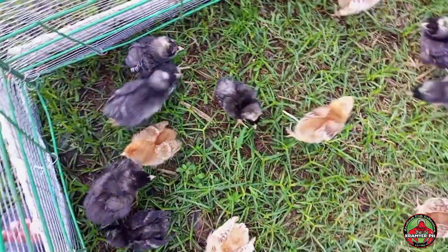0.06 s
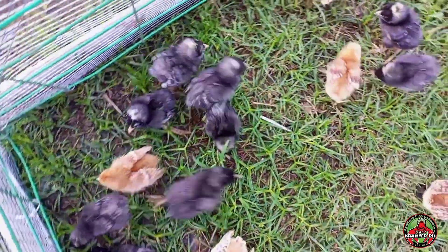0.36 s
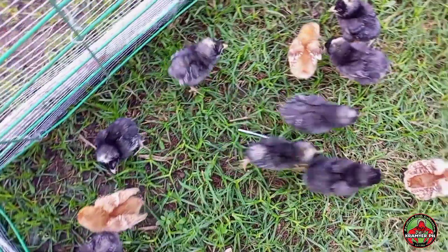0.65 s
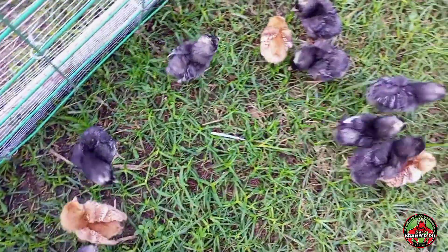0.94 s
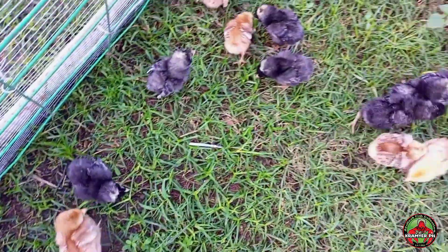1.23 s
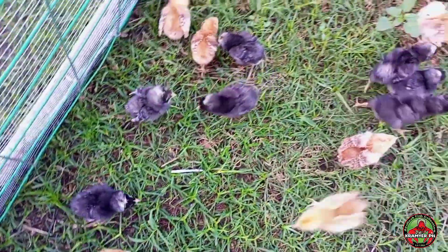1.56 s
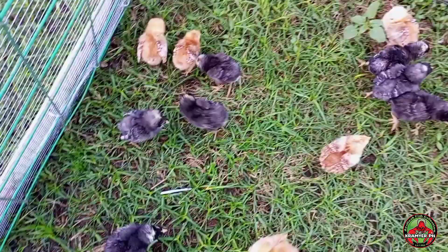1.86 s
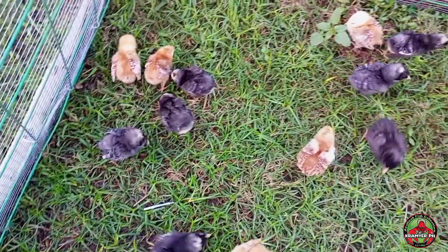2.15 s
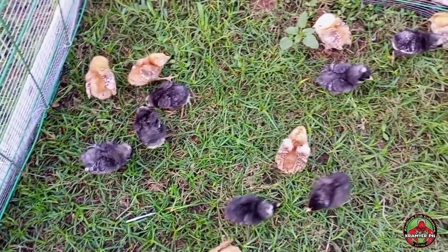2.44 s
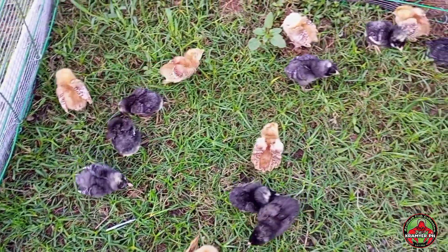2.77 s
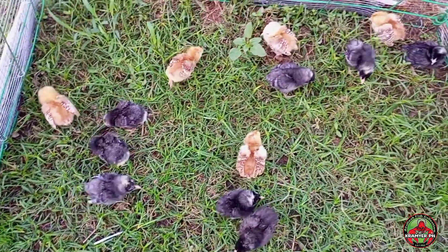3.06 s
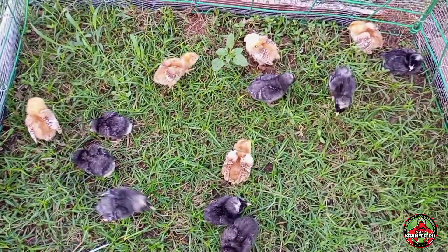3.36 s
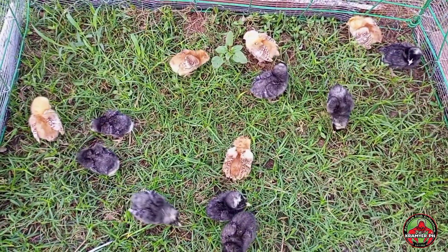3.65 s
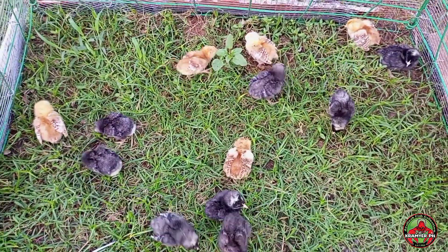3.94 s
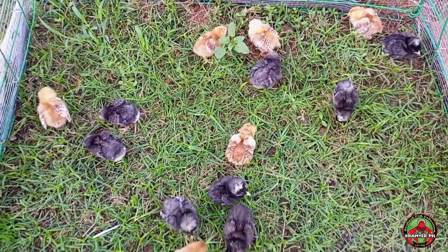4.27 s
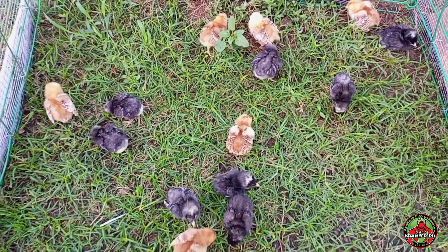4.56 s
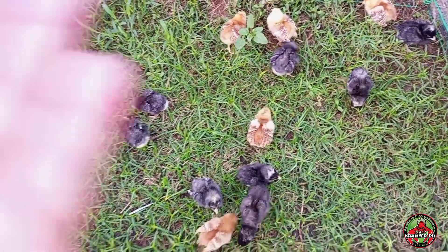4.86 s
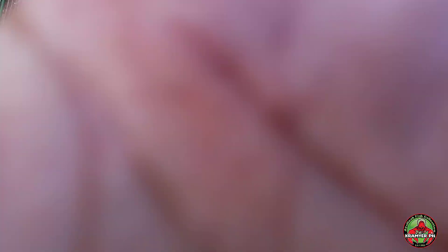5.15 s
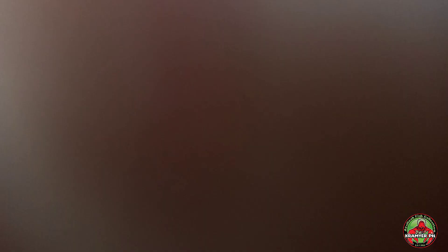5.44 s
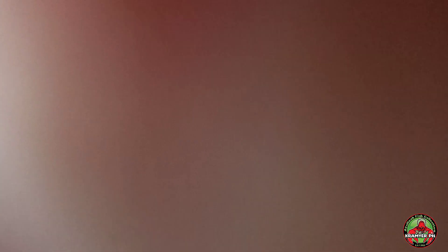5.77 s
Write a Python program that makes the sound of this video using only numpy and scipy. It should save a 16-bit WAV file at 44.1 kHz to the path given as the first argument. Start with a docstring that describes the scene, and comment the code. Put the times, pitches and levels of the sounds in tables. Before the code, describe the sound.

Close, overlapping peeps from a flock of baby chicks fill the whole stretch, each a quick, high whistle that drops in pitch. The open-air background is quiet: a thin insect shrill, an intermittent low hum, barely audible roosters and a distant dog that barks four times early and twice past the middle. Near the end, fingers knock briefly on the hand-held microphone.

```python
"""Young chicks peep over one another in a wire pen on grass, close to a hand-held microphone.
Each peep is a falling whistle with a weak octave; all share one arch of pitch and level.
Further off a dog yaps hoarsely, roosters crow, insects shrill and a low hum comes and goes.
The grip shifts with dull bumps; fingers tap the microphone midway and near the end."""
import sys
import numpy as np
from scipy import signal
from scipy.fft import rfft, irfft
from scipy.io import wavfile
from scipy.ndimage import uniform_filter1d, minimum_filter1d

SR = 44100
rng = np.random.default_rng(int(sys.argv[2]) if len(sys.argv) > 2 else 0)


def generate_wav(sig):
    """Save sig (samples, or channels by samples) to the path in sys.argv[1] as 16-bit PCM at SR."""
    pcm = np.round(np.clip(np.atleast_2d(sig).T, -1, 1) * 32767).astype(np.int16)
    wavfile.write(sys.argv[1], SR, pcm)


N = 255950
TIME_S = np.arange(N) / SR

# still air and distant flock: (frequency [Hz], relative density [dB])
AIR_SPECTRUM = [(30, -16), (70, 4.5), (130, -0.5), (240, -2), (350, -12), (800, -12.5), (1800, -12),
                (3000, -7.5), (5000, 9), (7000, -19), (11300, -32), (12500, -31.5), (15000, -10)]
# hum envelope: (time [s], level [dB])
HUM_ENVELOPE = [(0.0, -57), (0.27, -46), (0.76, -50), (0.98, -64), (1.06, -48.5), (1.45, -50), (1.53, -60),
                (2.37, -72), (2.97, -44.5), (3.54, -68), (4.13, -54.5), (4.2, -66.5), (4.73, -67),
                (4.9, -44), (5.3, -59), (5.35, -42), (5.65, -53), (5.8, -64)]
# held notes of far crows: (start [s], length [s], start pitch [Hz], end pitch [Hz], relative level [dB])
CROW_NOTES = [(0, .13, 816, 830, -51), (.45, 0.48, 796, 825, -64.5), (1.142, 0.74, 824, 890, -65.5),
              (2.651, 0.13, 572, 618, -50.5), (2.796, 0.57, 655, 628, -59), (4.107, .16, 856, 875, -56.5),
              (4.337, .37, 648, 704, -64), (4.488, 0.14, 824, 823, -52), (4.755, 0.089, 763, 978, -50.5),
              (5.048, 0.38, 833, 839, -47.5), (5.45, 0.24, 827, 835, -61)]
# short far whines: (start [s], length [s], start pitch [Hz], end pitch [Hz], relative level [dB])
WHINE_NOTES = [(1.37, 0.034, 1064, 1165, -52), (2.147, 0.029, 1133, 1040, -59),
               (3.462, .067, 1085, 937, -39.5), (4, 0.025, 980, 903, -40), (4.054, 0.138, 790, 717, -56.5),
               (4.951, 0.076, 1198, 1074, -54)]
# barks: (start [s], length [s], nominal pitch [Hz], relative level [dB],
# yelp start pitch [Hz], yelp end pitch [Hz], relative yelp level [dB])
DOG_BARKS = [(0.159, .13, 224.9, -36.5, 888, 929, -34), (0.66, 0.099, 248, -39, 966, 1036, -31),
             (1.136, 0.13, 233.5, -42.5, 990, 1081, -38), (1.587, 0.13, 273.4, -47, 858, 1172, -35.5),
             (3.213, 0.117, 221.6, -34, 902, 860, -37.5), (3.723, 0.11, 213.7, -33.5, 800, 862, -34.5)]
# dog's throat resonances: (centre [Hz], nominal width [Hz], gain [dB])
DOG_FORMANTS = [(666, 50, 4), (780, 140, -3.5), (1133, 140, 6.5), (1350, 92, 6), (1935, 380, 4.5),
                (2340, 140, 4), (5500, 300, -5)]
# fingertips on the case: (time [s], peak [dB], contact decay [s])
CASE_TAPS = [(2.771, -37, 0.0051), (2.864, -39.5, 0.0078), (5.1903, -23, 0.0008), (5.199, -12, 0.00017),
             (5.329, -24.5, 0.0022), (5.337, -15.5, 0.0028)]
# shifts of the grip: (time [s], peak [dB], resonance [Hz])
GRIP_BUMPS = [(1.017, -41.5, 233), (2.808, -40, 193), (2.964, -45, 161), (3.029, -64, 305),
              (3.254, -34.5, 125), (4.297, -51.5, 252), (4.821, -49, 249), (5.042, -44.5, 239),
              (5.319, -39, 57)]
# strength of the peep at each pitch: (pitch [Hz], gain [dB])
PEEP_GAIN = [(2200, 5.5), (2800, 2), (3400, 0), (3900, 0.5), (4400, -2), (4900, -1.5), (5600, -2)]
# strength of the peep's octave at each pitch: (pitch [Hz], gain [dB])
PEEP_OCTAVE_GAIN = [(2800, -8), (3100, -0.5), (3450, 5), (3800, -2), (4400, -1), (5200, -1.5)]
# near peeps: (start [s], length [s], top pitch [Hz], target pitch [Hz], bend [1 slides, 4 holds the top],
# plunge share of the fall [0-1], relative level [dB], loudest point [0-1], base octave level [dB])
NEAR_PEEPS = [(-0.03, 0.16, 4268, 2970, 2.22, 0.0, -6.5, 0.88, -17.5),
              (-0.02, 0.11, 4890, 3300, 3.54, 0.0, -6, 0.99, -40),
              (-0.015, 0.076, 5550, 4720, 0.6, 0.64, -19, 0.84, -32),
              (0.018, 0.12, 4820, 2790, 2, 0.0, -11, 0.37, -33),
              (0.049, 0.066, 3937, 2940, 1.412, 0.17, -6.5, 0.28, -20),
              (0.111, 0.13, 4950, 3120, 0.62, 0.35, -10, 0.27, -22),
              (0.159, 0.1, 4208, 1976, 2.6, 0.01, -8.5, 0.11, -17),
              (0.193, 0.13, 4050, 2910, 2.9, 0.04, -24.5, 0.37, -34.5),
              (0.241, 0.21, 5240, 2740, 1.9, 0.06, -24, 0.6, -21),
              (0.245, 0.067, 5100, 4550, 2.4, 0.2, -29, 0.4, -40),
              (0.315, 0.074, 4810, 2790, 0.88, 0.08, -4, 0.52, -42),
              (0.384, 0.12, 4894, 2630, 2.55, 0.0, -13.5, 0.14, -31),
              (0.397, 0.031, 4210, 2610, 0.6, 0.22, -18.5, 0.42, -38),
              (0.397, 0.081, 5314, 2620, 1.54, 0.01, -8.5, 0.76, -30),
              (0.416, 0.15, 4608, 2690, 1.22, 0.39, -8.5, 0.9, -25),
              (0.433, 0.22, 5090, 3510, 1.4, 0.0, -12.5, 0.6, -35),
              (0.435, 0.075, 5327, 4160, 0.45, 0.14, -13, 0.35, -29),
              (0.449, 0.047, 3950, 2680, 0.86, 0.37, -1.5, 0.19, -33.5),
              (0.477, 0.14, 5140, 3070, 2.5, 0, -23, 0.91, -38),
              (0.536, 0.082, 4493, 3210, 0.7, 0.52, -7.5, 0.76, -38),
              (0.558, 0.044, 4696, 2770, 0.85, 0, -14.5, 0.67, -32),
              (0.655, 0.16, 4997, 3000, 0.72, 0.37, -3.5, 0.91, -27.5),
              (0.663, 0.17, 5010, 2770, 1.45, 0.24, -14.5, 0.85, -34),
              (0.702, 0.12, 4905, 1995, 2.44, 0.12, -8, 0.13, -27.5),
              (0.717, 0.068, 4740, 2820, 0.5, 0.13, -14, 0.7, -44),
              (0.768, 0.15, 5210, 2760, 0.68, 0.28, -7.5, 0.84, -18.5),
              (0.804, 0.065, 4380, 2130, 0.63, 0.36, -2.5, 0.26, -38),
              (0.921, 0.12, 4585, 2940, 0.54, 0.33, -16, 0.66, -10.5),
              (0.93, 0.1, 6020, 5190, 1.14, 0.03, -31, 0.49, -40),
              (0.989, 0.14, 5000, 3020, 2.7, 0.04, -12, 0.91, -36),
              (1.028, 0.05, 3920, 2680, 1.05, 0.01, -13, 0.39, -45),
              (1.085, 0.0435, 4256, 3080, 1.02, 0.14, -5.5, 0.63, -38),
              (1.108, 0.16, 4955, 2005, 2.5, 0.3, -10.5, 0.82, -34),
              (1.11, 0.1206, 4255, 2580, 1.9, 0.32, -7.5, 0.34, -40),
              (1.115, 0.15, 4313, 2890, 2.6, 0.63, -10.5, 0.78, -31),
              (1.118, 0.073, 5090, 4160, 0.6, 0.03, -10, 0.81, -25),
              (1.138, 0.45, 4920, 4300, 1.5, 0.2, -22, 0.49, -43),
              (1.161, 0.066, 4180, 2530, 2.3, 0, -12.0, 0.67, -14.5),
              (1.214, 0.073, 4930, 3700, 0.77, 0.63, -19.0, 0.73, -34),
              (1.332, 0.13, 5050, 3150, 2.13, 0.46, -13.5, 0.95, -38),
              (1.342, 0.064, 4280, 2060, 2.8, 0.0, -17.5, 0.55, -37),
              (1.39, 0.033, 6220, 5040, 0.91, 0, -20, 0.23, -42),
              (1.397, 0.068, 4360, 3930, 0.602, 0.01, -12, 0.55, -31),
              (1.437, 0.055, 3610, 2490, 1.3, 0.02, -6.5, 0.15, -43),
              (1.445, 0.074, 4870, 2010, 0.58, 0.46, -6, 0.52, -19.5),
              (1.52, 0.044, 4080, 2340, 0.8, 0.26, -13.5, 0.43, -36),
              (1.538, 0.15, 4670, 2430, 1.95, 0.05, -15, 0.54, -22),
              (1.541, 0.13, 4394, 2630, 1.2, 0.34, -11.5, 0.81, -14),
              (1.605, 0.15, 4980, 3700, 2.6, 0.2, -34, 0.49, -40),
              (1.706, 0.058, 4580, 2670, 0.66, 0.17, -13, 0.57, -39.5),
              (1.711, 0.14, 5259, 1971, 2.6, 0.26, -12, 0.88, -23.5),
              (1.713, 0.17, 4520, 2013, 1.8, 0.76, -11, 0.78, -40),
              (1.762, 0.13, 4440, 2840, 0.6, 0.83, -13, 0.61, -44),
              (1.775, 0.059, 4260, 3400, 1.16, 0.0, 3.5, 0.45, -34.5),
              (1.819, 0.1, 4370, 2950, 0.672, 0.1, -17.5, 0.15, -34.5),
              (1.943, 0.076, 5100, 3700, 2.2, 0.13, -28.5, 0.58, -35),
              (1.948, 0.11, 4370, 2830, 1.16, 0.33, -7.5, 0.82, -18),
              (1.998, 0.12, 5960, 3010, 0.94, 0.28, -28.5, 0.12, -43),
              (2.044, 0.067, 4090, 2660, 1.73, 0.0, -21, 0.82, -41),
              (2.059, 0.067, 4550, 2900, 0.6, 0.17, -16, 0.78, -43.5),
              (2.118, 0.12, 4420, 2790, 0.64, 0.57, -16, 0.45, -18.5),
              (2.202, 0.12, 4880, 2650, 2.1, 0.0, -14.5, 0.37, -29),
              (2.235, 0.14, 5000, 2920, 2.2, 0.0, -19.5, 0.82, -24),
              (2.244, 0.086, 5330, 4740, 1.2, 0.0, -17.5, 0.7, -38),
              (2.248, 0.082, 5016, 2600, 1.27, 0.0, -12.5, 0.26, -41),
              (2.285, 0.05, 3610, 2840, 1.43, 0.02, -8, 0.26, -20.5),
              (2.332, 0.084, 5140, 3200, 0.55, 0.13, -13, 0.64, -34),
              (2.331, 0.077, 4650, 2360, 0.92, 0.32, -8, 0.48, -33),
              (2.371, 0.095, 4750, 2970, 2, 0.0, -21, 0.55, -32),
              (2.395, 0.097, 4170, 3140, 0.57, 0.3, -16, 0.51, -38),
              (2.486, 0.118, 6040, 2900, 0.9, 0.5, -25.5, 0.2, -26),
              (2.518, 0.0893, 5080, 2760, 1.3, 0.04, -16.5, 0.83, -44.5),
              (2.526, 0.12, 4430, 2880, 1.01, 0.38, -12, 0.73, -21.5),
              (2.544, 0.14, 4775, 2370, 0.8, 0.63, -21.5, 0.88, -33),
              (2.573, 0.093, 4890, 3500, 1.8, 0.56, -14, 0.55, -30),
              (2.602, 0.13, 4890, 2540, 2.77, 0.0, -12, 0.69, -34),
              (2.657, 0.052, 3860, 2930, 2, 0.15, -6.5, 0.63, -33),
              (2.681, 0.15, 4700, 4200, 2.5, 0.6, -36, 0.93, -38),
              (2.753, 0.13, 5028, 2000, 2.18, 0.07, -7, 0.47, -48),
              (2.81, 0.064, 4420, 2006, 0.628, 0.53, -9, 0.81, -18.5),
              (2.821, 0.072, 4076, 2000, 0.74, 0.01, -23.5, 0.21, -41),
              (2.951, 0.14, 4714, 2690, 0.82, 0.46, -13, 0.83, -21),
              (2.98, 0.14, 4840, 3150, 2.2, 0.0, -12.5, 0.19, -28),
              (2.982, 0.088, 5840, 3600, 1.27, 0.28, -22, 0.21, -38),
              (3.065, 0.059, 4350, 2880, 0.73, 0.27, -6, 0.44, -30.5),
              (3.127, 0.084, 5410, 1980, 0.65, 0.31, -11.5, 0.45, -30),
              (3.196, 0.12, 4915, 3000, 2.08, 0.04, -13.5, 0.845, -28.5),
              (3.27, 0.15, 4760, 4620, 2.7, 0.5, -36, 0.56, -40),
              (3.376, 0.14, 4647, 3240, 0.56, 0.32, -10, 0.77, -19.5),
              (3.386, 0.081, 4633, 3800, 0.6, 0.05, -7.5, 0.42, -30),
              (3.416, 0.059, 5810, 4470, 1.5, 0.1, -31.5, 0.19, -38),
              (3.514, 0.067, 5170, 3080, 0.66, 0.03, -20.5, 0.67, -38),
              (3.516, 0.095, 5310, 1970, 1.1, 0.31, -14, 0.83, -38),
              (3.535, 0.17, 4940, 2620, 0.56, 0.32, -18, 0.76, -20.5),
              (3.592, 0.13, 5040, 3380, 1.4, 0.0, -15.5, 0.15, -23.5),
              (3.632, 0.11, 4910, 1984, 0.75, 0.47, -14, 0.16, -36),
              (3.727, 0.065, 4690, 2016, 1.9, 0.42, -26.5, 0.51, -26),
              (3.75, 0.056, 5023, 3470, 1.16, 0.68, -11, 0.7, -38),
              (3.785, 0.11, 6150, 2900, 1.73, 0.08, -21.5, 0.94, -40),
              (3.798, 0.058, 4660, 1950, 0.63, 0.33, -14, 0.66, -31),
              (3.908, 0.15, 4350, 3420, 1.6, 0.04, -13, 0.41, -14.5),
              (3.914, 0.14, 4220, 2710, 0.6, 0.72, -16.5, 0.77, -38),
              (3.916, 0.094, 5170, 2020, 1.21, 0.25, -8.5, 0.56, -45),
              (3.937, 0.098, 4800, 2570, 1.8, 0.02, -12.5, 0.35, -30),
              (3.946, 0.17, 5020, 2780, 2.3, 0.43, -18.5, 0.95, -40),
              (4.035, 0.2, 4730, 2820, 3.7, 0.8, -23, 0.93, -27.5),
              (4.261, 0.1, 5910, 3020, 1.78, 0.03, -23.5, 0.87, -40),
              (4.342, 0.16, 5410, 3350, 0.6, 0.31, -9.5, 0.76, -21.5),
              (4.405, 0.0684, 4080, 2020, 2.4, 0.51, -9.5, 0.13, -40.5),
              (4.427, 0.11, 5030, 3370, 2.2, 0.0, -14, 0.64, -29.5),
              (4.504, 0.088, 4990, 3000, 1.15, 0.2, -14, 0.8, -30),
              (4.594, 0.13, 4363, 2540, 1.8, 0.39, -20.0, 0.97, -45.5),
              (4.629, 0.095, 5220, 2710, 1.52, 0.04, -20.5, 0.83, -42),
              (4.669, 0.13, 5970, 1980, 1.63, 0.04, -30.5, 0.33, -26),
              (4.808, 0.19, 5077, 2040, 3.9, 0.5, -19, 0.88, -17),
              (4.827, 0.23, 5330, 2940, 0.81, 0.2, -20, 0.97, -51),
              (4.828, 0.067, 4780, 2380, 1.13, 0, -33, 0.7, -35),
              (4.871, 0.1, 4200, 2640, 2, 0.0, -23, 0.85, -13),
              (4.911, 0.14, 4223, 2000, 3.5, 0.22, -19, 0.92, -52),
              (4.923, 0.11, 5050, 1990, 2.4, 0.7, -12.5, 0.76, -27),
              (4.948, 0.14, 4720, 2000, 1.03, 0.38, -23.5, 0.89, -20),
              (4.976, 0.13, 4607, 1995, 2.6, 0.46, -13, 0.39, -21.5),
              (5.009, 0.066, 3884, 2920, 1.8, 0.21, -5.5, 0.35, -49.5),
              (5.125, 0.13, 6000, 2620, 2.05, 0.05, -31, 1, -19),
              (5.257, 0.14, 5200, 1998, 2.25, 0.12, -11.5, 0.81, -27),
              (5.263, 0.087, 4165, 2880, 0.91, 0.23, -15.0, 0.77, -38),
              (5.287, 0.14, 5230, 2590, 1.4, 0.19, -19, 0.13, -30),
              (5.331, 0.069, 4335, 2005, 0.66, 0.42, -6.5, 0.26, -36),
              (5.428, 0.15, 4975, 3660, 1.48, 0, -23.5, 0.4, -11.5),
              (5.435, 0.1, 4980, 3250, 0.91, 0, -37, 0.5, -30),
              (5.555, 0.035, 3640, 2250, 0.76, 0.0, -21.5, 0.51, -11),
              (5.559, 0.082, 4130, 3190, 0.63, 0.09, -12.5, 0.26, -18.5),
              (5.62, 0.11, 5358, 3510, 2.26, 0.01, -8, 0.96, -49.5),
              (5.664, 0.1, 5426, 2080, 0.7, 0.3, -14.5, 0.8, -28),
              (5.704, 0.071, 4207, 2014, 0.73, 0.52, -8, 0.22, -34),
              (5.747, 0.076, 5500, 4680, 0.87, 0, -24.5, 0.4, -30)]


def undb(db):
    """Decibels to gain."""
    return 10 ** (np.asarray(db) / 20)


def unit_rms(x):
    """Scale to rms 1."""
    return x / np.sqrt(np.mean(x ** 2) + 1e-20)


def add(out, start_s, x):
    """Mix x into out from start_s on."""
    i = int(round(start_s * SR))
    x, i = x[max(-i, 0):], max(i, 0)
    out[i:i + len(x)] += x[:max(N - i, 0)]


def ring(x, hz, width_hz, stages):
    """Cascade of equal resonances, gain 1 at the centre."""
    for _ in range(stages):
        x = signal.lfilter(*signal.iirpeak(hz, hz / width_hz, fs=SR), x)
    return x


def walk(rate_hz, size=N):
    """Smooth random drift, spread about 1."""
    step = max(int(SR / rate_hz), 1)
    return 1.2 * uniform_filter1d(np.repeat(rng.standard_normal(size // step + 1), step), step)[:size]


def phase_rad(hz):
    """Phase of a moving pitch."""
    return 2 * np.pi * np.cumsum(hz) / SR


def swell(u, edge):
    """Rounded rise and fall over u = 0..1; a smaller edge is steeper."""
    return np.sin(np.pi / 2 * np.clip(np.minimum(u, 1 - u) / edge, 0, 1)) ** 2


def scatter(x, t60_s, wet_db, delay_s):
    """Direct sound plus scatter from fence, walls and trees."""
    t = np.arange(SR) / SR
    tail = rng.standard_normal(SR) * undb(-60 * t / t60_s) * np.clip(t / delay_s - 1, 0, 1)
    return x + undb(wet_db) * signal.fftconvolve(x, tail / np.linalg.norm(tail))[:N]


def noise_band(hz, half_width_hz):
    """Low-passed noise shifted up to hz, rms 1."""
    lowpass = signal.butter(3, half_width_hz, fs=SR, output="sos")
    real, imag = (unit_rms(signal.sosfilt(lowpass, rng.standard_normal(N))) for _ in range(2))
    return unit_rms(np.real((real + 1j * imag) * np.exp(2j * np.pi * hz * TIME_S)))


def air(level_db=-54):
    """Faint open-air noise, drifting slightly in level."""
    hz, db = np.transpose(AIR_SPECTRUM)
    colour = undb(np.interp(np.log(np.fft.rfftfreq(N, 1 / SR) + 1), np.log(hz), db))
    noise = irfft(rfft(rng.standard_normal(N)) * colour, N)
    return unit_rms(noise) * undb(level_db + walk(5.48))


def insects(shrill_db=-45, trill_db=-50, chorus_db=-51, stroke_hz=18, trill_hz=8080, sweep_hz=800):
    """A steady shrill, and one nearer insect whose strokes glide up over a chorus of its kind."""
    shrill = noise_band(hz=10330, half_width_hz=480) * undb(shrill_db + 0.27 * walk(31))
    stroke = phase_rad(stroke_hz * (1 + .08 * walk(5))) / (2 * np.pi) % 1
    pitch_hz = trill_hz + sweep_hz * (stroke - .5) + 130 * walk(1200)
    trill = unit_rms(np.sin(phase_rad(pitch_hz)) * swell(stroke, 1.0)) * undb(trill_db)
    chorus = noise_band(hz=8300, half_width_hz=750) * undb(chorus_db + walk(29))
    return shrill + trill + chorus


def hum(start_hz=130, end_hz=122.5, octave_db=-21, rumble_db=-8, flutter_db=0.5):
    """A slowly sinking low tone and a little rumble swell and fade together."""
    phase = phase_rad(np.linspace(start_hz, end_hz, N))
    tone = unit_rms(np.sin(phase) + undb(octave_db + 3.9 * walk(5.5)) * np.sin(2 * phase))
    rumble = unit_rms(ring(rng.standard_normal(N), hz=125, width_hz=59, stages=2))
    level_db = np.interp(TIME_S, *np.transpose(HUM_ENVELOPE)) + flutter_db * walk(22)
    return (tone + undb(rumble_db) * rumble) * undb(level_db)


def far_notes(notes, fundamental_db, octave_db, waver, flicker_db):
    """Distance leaves two partials of each hoarse note, broken up and blurred by echoes."""
    out = np.zeros(N)
    for start_s, length_s, from_hz, to_hz, db in notes:
        size = int(length_s * SR)
        u = np.linspace(0, 1, size)
        phase = phase_rad(np.linspace(from_hz, to_hz, size) * (1 + waver * walk(450, size)))
        note = undb(fundamental_db) * np.sin(phase) + undb(octave_db) * np.sin(2 * phase)
        add(out, start_s, note * swell(u, 0.13) * undb(db + flicker_db * walk(39.2, size)))
    return scatter(out, t60_s=0.059, wet_db=-1.5, delay_s=0.011)


def roosters():
    """Far crows, strongest at the octave."""
    return far_notes(CROW_NOTES, fundamental_db=-9, octave_db=-4, waver=.026, flicker_db=6)


def whines():
    """Short far glides, nearly pure."""
    return far_notes(WHINE_NOTES, fundamental_db=-6, octave_db=-37, waver=0.016, flicker_db=5.5)


def dog(jitter=0.026, arch=0.1508, yelp_waver=0.033, yelp_octave_db=-19.5, yelp_lead_s=.02, gain_db=1):
    """Hoarse, uneven pulses ring the throat; a wavering yelp leads each bark."""
    out = np.zeros(N)
    for start_s, length_s, hz, db, from_hz, to_hz, yelp_db in DOG_BARKS:
        size = int(length_s * SR)
        u = np.linspace(0, 1, size)
        phase = phase_rad(hz * (1 + arch * (np.sin(2 * u) - .75) + jitter * walk(300, size)))
        pulses = unit_rms(sum(np.cos(k * phase) for k in range(1, 13)))
        rasp = rng.standard_normal(size) * (1 + np.cos(phase))
        bark = sum(undb(formant_db) * ring(pulses + rasp, formant_hz, 1.06 * width_hz, stages=2)
                   for formant_hz, width_hz, formant_db in DOG_FORMANTS)
        add(out, start_s, unit_rms(bark * swell(u, 0.29)) * undb(db))
        yelp_phase = phase_rad(np.linspace(from_hz, to_hz, size) * (1 + yelp_waver * walk(231, size)))
        yelp = np.sin(yelp_phase) + undb(yelp_octave_db) * np.sin(2 * yelp_phase)
        add(out, start_s - yelp_lead_s, unit_rms(yelp * swell(u, 0.25)) * undb(yelp_db))
    return scatter(out, t60_s=0.21, wet_db=-2, delay_s=0.0071) * undb(gain_db)


def knock(peak_db, hz, width_hz, contact_s):
    """A brief push into a damped, steep-sided resonance."""
    t = np.arange(SR // 5) / SR
    push = rng.standard_normal(len(t)) * np.exp(-t / contact_s)
    body = ring(push, hz, width_hz, stages=3)
    return body / np.abs(body).max() * undb(peak_db)


def handling():
    """Fingers tap the case; the grip shifts with dull bumps."""
    out = np.zeros(N)
    for start_s, peak_db, contact_s in CASE_TAPS:
        add(out, start_s, knock(peak_db, hz=1050, width_hz=1750, contact_s=contact_s))
    for start_s, peak_db, hz in GRIP_BUMPS:
        add(out, start_s, knock(peak_db, hz, width_hz=0.45 * hz, contact_s=0.019))
    return out


def peep_pitch_hz(u, length_s, top_hz, target_hz, bend, plunge, floor_hz=2190, scoop_hz=168, scoop_s=.008):
    """Pitch scoops up briefly, then falls, often plunging at the end."""
    fall = (1 - plunge) * u ** bend + plunge * u ** 8
    hz = np.maximum(top_hz - (top_hz - target_hz) * fall, floor_hz)
    hz -= scoop_hz * np.exp(-u * length_s / scoop_s)
    return hz * (1 + 0.0039 * walk(400, len(u)) + 0.01096 * walk(111.23, len(u)))


def peep(length_s, top_hz, target_hz, bend, plunge, level_db, loudest, octave_db,
         rise_db=20, fall_db=18.5, swell_power=1.336, flutter_db=1.94,
         fourth_db=-57, rasp_db=-32, attack_s=0.0028, release_s=.0049):
    """One falling whistle that swells and fades; its level and weak octave vary with pitch."""
    size = int(length_s * SR)
    u = np.linspace(0, 1, size)
    hz = peep_pitch_hz(u, length_s, top_hz, target_hz, bend, plunge)
    loudest = np.clip(loudest, .05, .95)
    before_peak = np.clip(1 - u / loudest, 0, 1)
    after_peak = np.clip((u - loudest) / (1 - loudest), 0, 1)
    db = level_db - rise_db * before_peak ** swell_power - fall_db * after_peak ** swell_power
    db += np.interp(hz, *np.transpose(PEEP_GAIN)) + flutter_db * walk(200, size)
    phase = phase_rad(hz) + rng.uniform(0, 2 * np.pi)
    octave = undb(octave_db + np.interp(hz, *np.transpose(PEEP_OCTAVE_GAIN))) * np.sin(2 * phase)
    fourth = undb(fourth_db) * np.sin(4 * phase)
    # air rushing past the membrane rasps just above the note
    rasp = undb(rasp_db) * uniform_filter1d(walk(1600, size), size=28) * np.sin(1.166 * phase)
    gate = np.clip(np.minimum(u / attack_s, (1 - u) / release_s) * length_s, 0, 1)
    return (np.sin(phase) + octave + fourth + rasp) * undb(db) * np.sin(np.pi / 2 * gate) ** 2


def chicks(answers=110, answer_s=.1, far_db=-34, spread_db=4, far_ratio=1.06, ratio_span=0.34, far_bend=2):
    """Near chicks peep and set off faint answers from the far side of the pen."""
    out = np.zeros(N)
    for start_s, *call in NEAR_PEEPS:
        add(out, start_s, peep(*call))
    _, length_s, top_hz, target_hz, _, plunge, _, loudest, octave_db = np.median(NEAR_PEEPS, axis=0)
    for caller, lag, stretch, height, nearness in rng.random((answers, 5)):
        start_s = NEAR_PEEPS[int(caller * len(NEAR_PEEPS))][0] + answer_s * lag
        pitch_ratio = far_ratio + ratio_span * (height - .5)
        db = far_db + spread_db * (2 * nearness - 1)
        answer = peep(length_s * (.5 + .6 * stretch), top_hz * pitch_ratio, target_hz * pitch_ratio,
                      far_bend, plunge, db, loudest, octave_db)
        add(out, start_s, answer)
    pen = scatter(out, t60_s=0.017, wet_db=-10.5, delay_s=0.0011)
    return scatter(pen, t60_s=0.12, wet_db=-21, delay_s=0.00093)


def scene():
    """Pen in front, farmyard behind; mono."""
    return (chicks() + dog() + roosters() + whines() + handling() + hum() + insects() + air())[None]


def record(dry):
    """A quick limiter ducks the loudest peeps, their tips overload; deep bass and top are cut."""
    threshold, window_samples = 1.36, 265
    low_cut_hz, high_cut_hz = 48, 15700
    duck = minimum_filter1d(1 / np.maximum(np.abs(dry) / threshold, 1), size=window_samples)
    limited = dry * uniform_filter1d(duck, size=window_samples)
    clipped = limited / (1 + np.abs(limited) ** 20) ** (1 / 20)
    thinned = signal.sosfilt(signal.butter(2, low_cut_hz, "high", fs=SR, output="sos"), clipped)
    return signal.sosfilt(signal.ellip(8, .2, 70, high_cut_hz, fs=SR, output="sos"), thinned)


dry = scene()
out = record(dry)
generate_wav(out)
```